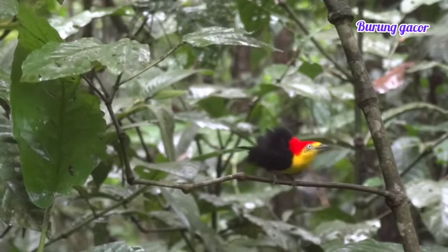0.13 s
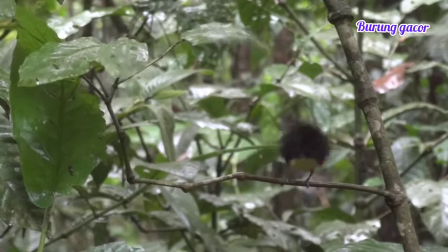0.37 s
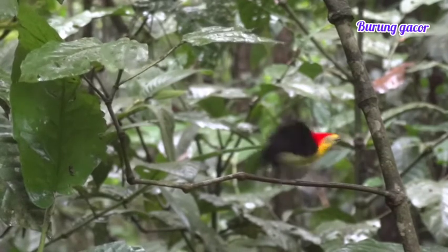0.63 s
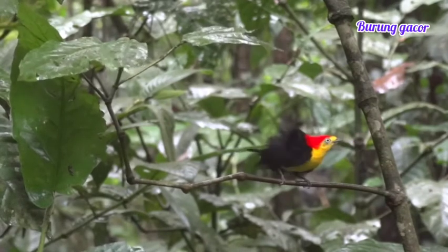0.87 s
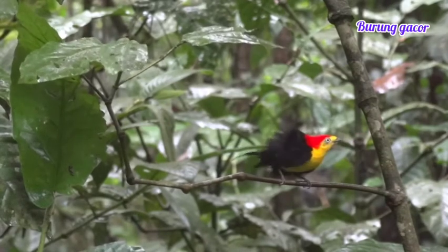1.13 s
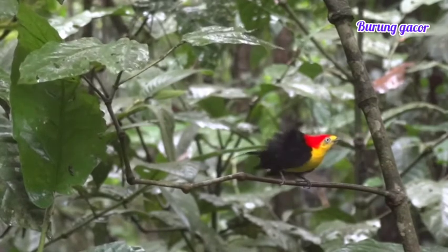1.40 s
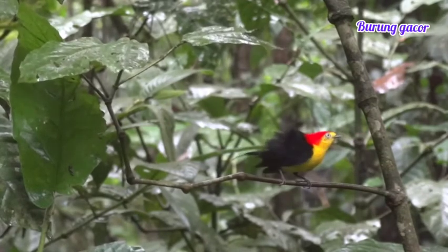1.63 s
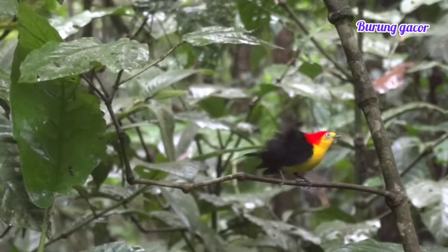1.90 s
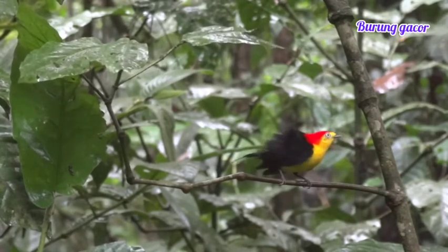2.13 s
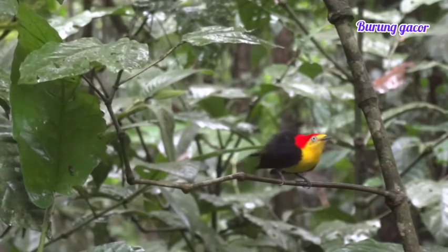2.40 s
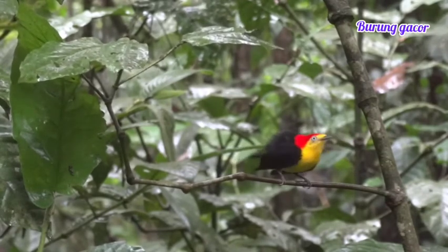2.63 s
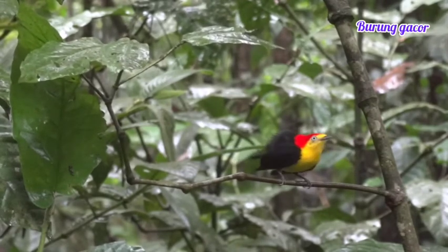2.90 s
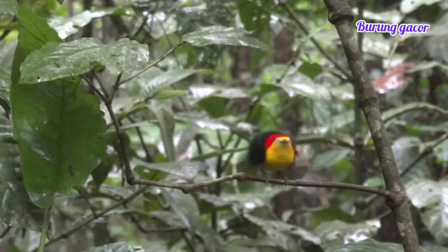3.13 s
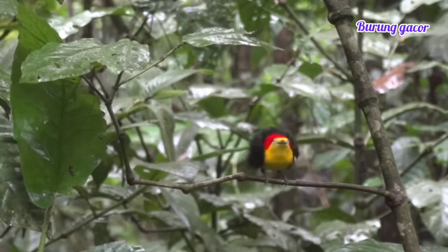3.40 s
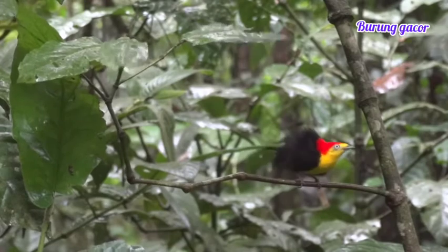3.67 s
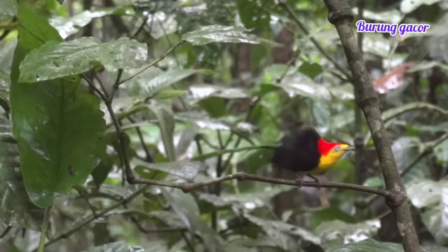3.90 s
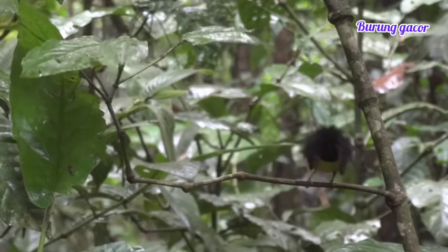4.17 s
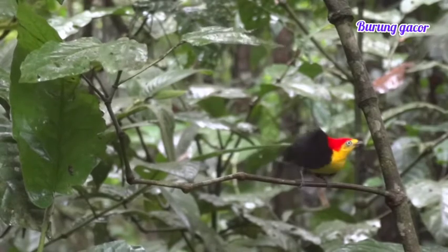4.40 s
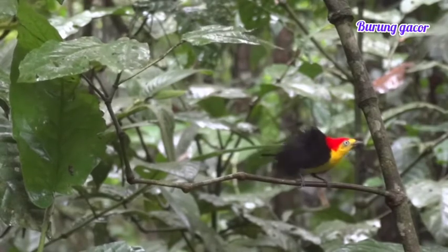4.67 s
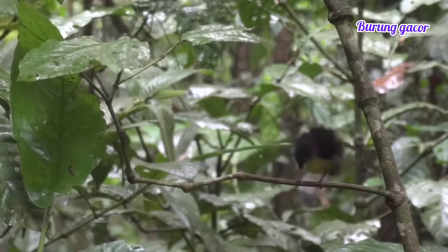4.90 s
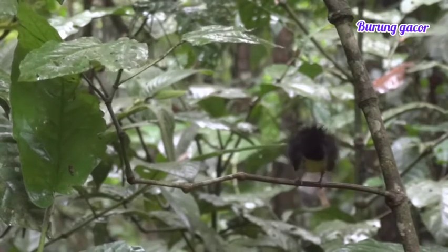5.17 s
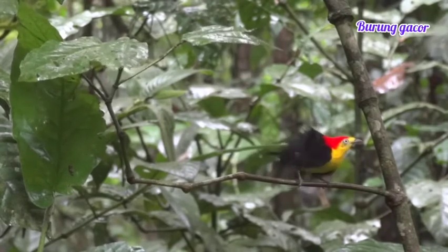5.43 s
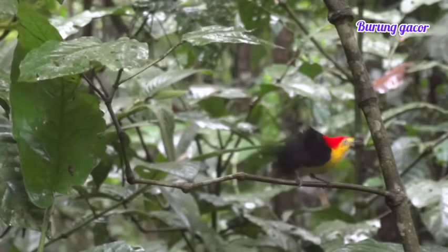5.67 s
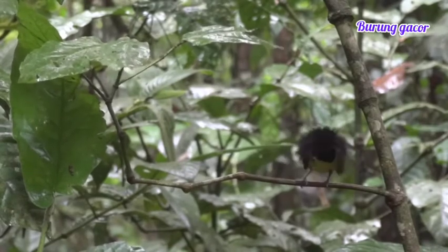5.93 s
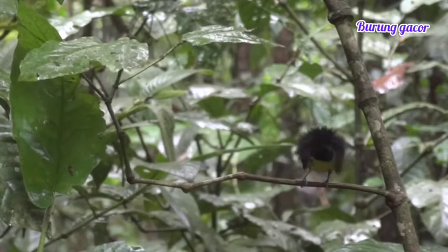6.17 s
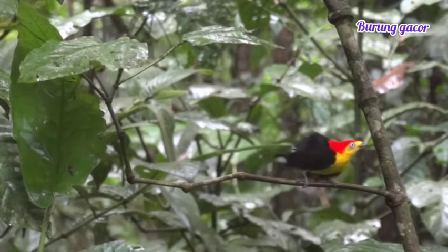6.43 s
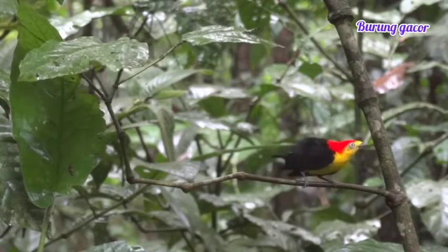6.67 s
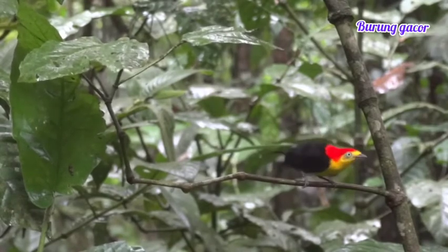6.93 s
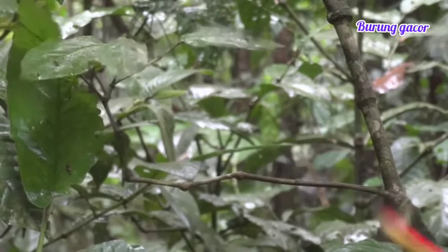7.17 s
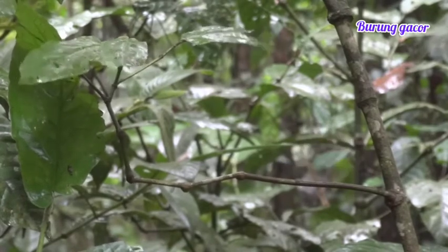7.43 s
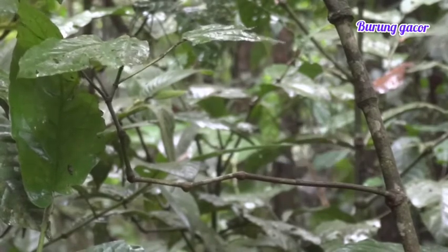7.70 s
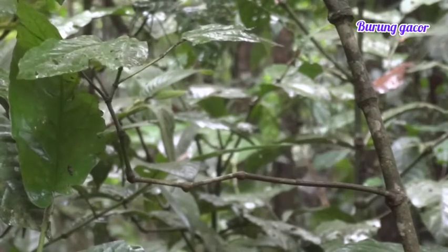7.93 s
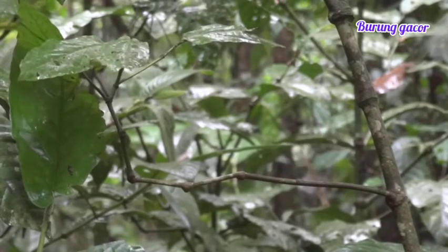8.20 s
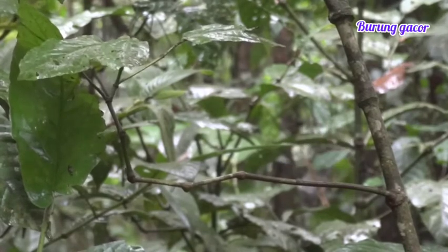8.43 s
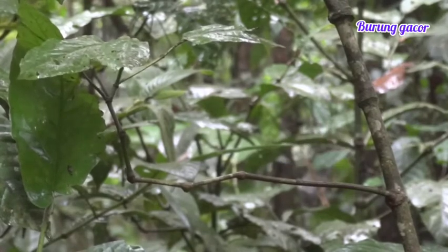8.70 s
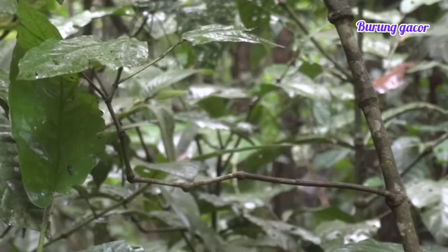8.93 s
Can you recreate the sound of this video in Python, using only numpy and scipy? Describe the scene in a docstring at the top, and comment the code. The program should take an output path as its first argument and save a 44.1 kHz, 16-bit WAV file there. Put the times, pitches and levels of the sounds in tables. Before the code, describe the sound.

High-pitched crickets and cicadas buzz without pause in a forest, a broad hiss dropping out early, a few dry snaps cutting through.

```python
"""Rainforest insect chorus

Crickets, cicadas, a rasper and a far frog: trains of strokes ring resonances, echoed by the trees.
Katydids and one cicada are coloured noise. Twigs snap in dying noise bursts; far coos and a whine are
narrow noise. Faintly, a camera's focus motor hums, whirrs and ticks its shell.
Behind: a blur of distant insects, a murmur of air and leaves, faint noise opposite left and right.
"""
import sys
import numpy as np
from scipy import signal
from scipy.io import wavfile
from scipy.ndimage import uniform_filter1d

SR = 44100
rng = np.random.default_rng(int(sys.argv[2]) if len(sys.argv) > 2 else 0)


def wrap_up_sound(samples):
    """Save the sound to the file named by the first command line argument, as 16-bit audio."""
    columns = np.atleast_2d(samples).T
    # keep every value between -1 and 1, then stretch to whole-number steps
    tamed = np.clip(columns, -1, 1)
    steps = np.round(tamed * 32767).astype(np.int16)
    wavfile.write(sys.argv[1], SR, steps)


def how_loud(loudness_db):
    """Turn decibels into a plain amplitude multiplier (0 dB gives 1, 20 dB gives 10)."""
    steps = np.asarray(loudness_db, float) / 20
    return 10 ** steps


N = 399987
T = np.arange(N) / SR

# chirps of the near crickets: start_s, length_s, level_db
CHIRPS = [(0, 0.25, -46), (.3, 0.21, -46), (.6, 0.24, -53), (.81, 0.29, -45.5), (1.1, 0.25, -45.5),
          (1.55, .19, -45), (1.78, 0.18, -52.5), (2.12, 0.21, -50.5), (2.55, 0.12, -49),
          (2.84, 0.18, -46.5), (3.19, 0.38, -51), (3.6, .18, -58), (3.9, .2, -51), (4.25, 0.31, -46.5),
          (4.64, .32, -45), (4.98, .39, -45.5), (5.418, 0.58, -46), (5.97, .26, -47.5), (6.27, 0.29, -46),
          (6.56, .15, -56), (6.83, 0.23, -44), (7.15, 0.24, -44), (7.49, 0.3, -46.5), (7.84, 0.42, -46),
          (8.35, 0.31, -46), (8.83, 0.3, -43.5)]
# slow level of the far cricket crowd, before a 5 dB cut: time_s, level_db
CRICKET_CROWD = [(0.0, -37), (0.3, -43.5), (4.37, -43.5), (4.95, -42), (6.97, -46), (7.7, -41.5),
                 (8.82, -43.5), (9.07, -41)]
# bursts of the buzzing cricket: start_s, length_s, level_db, wing_hz
BUZZES = [(0, 0.2, -47.5, 7090), (0.267, 0.26, -46.5, 6605), (0.61, 0.22, -44.5, 6850),
          (1.208, .32, -46.5, 6670), (1.784, 0.18, -44, 6580), (2.1, 0.17, -51.5, 6760),
          (2.41, 0.26, -48, 6740), (2.998, .24, -45.5, 6740), (3.538, .23, -47, 6670),
          (3.907, 0.15, -48.5, 6580), (4.307, .2, -46.5, 6840), (5.034, .2, -49, 6850),
          (5.46, 0.11, -50, 6710), (5.689, 0.21, -44, 6720), (6.056, 0.18, -44.5, 6810),
          (6.446, 0.26, -43.5, 6770), (6.835, 0.28, -47, 6740), (7.213, .22, -47, 6930),
          (7.514, 0.34, -46.5, 6650), (7.907, 0.29, -52, 6790), (8.217, 0.17, -50.5, 6900),
          (8.49, .25, -47.5, 6730), (8.81, 0.22, -49, 7010)]
# drumming cicada, swells in and breaks off: time_s, level_db
DRUMMER_LEVEL = [(0, -56), (.3, -56), (1.3, -52.5), (2.0, -56.5), (2.1, -66), (2.58, -70.5), (2.65, -79),
                 (2.78, -67.5), (3.5, -53), (4.2, -54.5), (4.7, -57.5), (5.7, -55), (5.85, -72), (6.1, -69),
                 (6.3, -72.5), (6.8, -57.5), (7.7, -58), (8.0, -58.5), (8.6, -54.5), (9.07, -54.5)]
# its beat and drum resonance: time_s, strokes_per_s, drum_hz
DRUMMER_DRUM = [(0, 107.2, 7780), (.75, 107.2, 7740), (.85, 106, 7680), (1.4, 106, 7800),
                (2.2, 106.1, 7850), (3.2, 105.8, 7640), (4.3, 107.1, 7760), (4.7, 107.6, 7980),
                (5.8, 107.5, 8050), (6.8, 105.6, 7560), (7.8, 107, 7740), (8.4, 107.7, 8020),
                (9.1, 107.7, 7900)]
# throbbing cicada, loudest of each throb: time_s, level_db
THROBBER_LEVEL = [(0, -56), (.8, -49.5), (2.5, -49.5), (4, -51.5), (6, -52.5), (9.07, -52.5)]
# its throb rate: time_s, throbs_per_s
THROB_RATE = [(0, 3.79), (2.99, 3.79), (3.01, 3.735), (9.07, 3.735)]
# its drum resonances: centre_hz, width_hz, gain_db
THROBBER_DRUM = [(5197, 217, 0), (5495, 230, 0.043)]
# hissing cicada, falls silent early: time_s, level_db
HISSER_LEVEL = [(0, -53), (.4, -55.5), (.8, -52.5), (1.5, -52.5), (2.5, -54), (2.6, -65.5), (3.4, -72),
                (3.6, -91.5), (9.1, -82)]
# its relative spectrum: freq_hz, density_db_per_hz
HISSER_COLOUR = [(1900, -47), (2300, -34.5), (2800, -19), (3200, -10.5), (4300, -10.5), (4900, 2),
                 (5600, 2), (5900, -4), (9500, -14), (11000, -39.5)]
# rising rasps, ever closer together: start_s, level_db
RASPS = [(0.32, -59.5), (0.82, -60), (1.36, -60), (1.79, -60.5), (2.35, -60), (2.784, -59.5), (3.232, -58),
         (3.62, -58.5), (4.012, -58), (4.425, -59), (4.81, -58.5), (5.17, -58), (5.517, -57.5),
         (5.868, -58), (6.196, -58.5), (6.51, -60), (6.845, -58), (7.16, -58), (7.473, -57.5), (7.792, -58),
         (8.12, -58), (8.43, -59), (8.73, -56.5), (9.032, -58)]
# thin tree-cricket note: time_s, level_db
TREE_CRICKET = [(0, -68), (3.2, -69.5), (4.3, -72.5), (5, -66.5), (5.45, -69.5), (5.9, -65), (7.1, -70.5),
                (7.9, -72.5), (8.5, -71.5), (9.07, -66)]
# bed of high katydids, uneven, fading away by 4.2 s: time_s, level_db
KATYDID_BED = [(0, -63), (1.0, -60.5), (1.7, -63.5), (2.3, -62.5), (2.6, -72.5), (3.1, -76), (3.7, -71),
               (3.95, -81), (4.2, -95)]
# katydid swells: middle_s, level_db, half_length_s
KATYDID_SWELLS = [(.46, -58.5, .09), (1.25, -57.5, .12), (1.96, -57.5, 0.1), (2.78, -58.5, .12),
                  (3.43, -58.5, 0.096)]
# katydid relative spectrum: freq_hz, density_db_per_hz
KATYDID_COLOUR = [(6060, -52), (10300, -12.5), (11100, -8.5), (11200, -0.5), (12000, -3.5), (14300, -6.5),
                  (15300, -16), (15500, -20)]
# frog croaks, before a 5 dB cut: start_s, level_db, throat_hz
CROAKS = [(.642, -84, 1850), (1.33, -84, 1850), (2.037, -84, 1850), (2.59, -86, 2120), (2.879, -84, 1800),
          (3.33, -84, 2100), (3.659, -85, 1840), (4.052, -83, 2120), (4.271, -83, 1850), (5.0, -85, 1870),
          (5.711, -85, 1870), (6.34, -85, 1820), (6.58, -78.5, 2150), (7.119, -86, 1780),
          (7.695, -87, 2100), (7.959, -85.5, 1840), (8.51, -83.5, 1880)]
# twig snaps, the first two close together: start_s, level_db, centre_hz, width_hz, t60_s
SNAPS = [(0.814, -38, 8700, 3800, 0.21), (0.95, -50, 7500, 9500, 0.046), (4.476, -44, 4300, 1900, .055),
         (6.724, -59, 5000, 4900, 0.032)]
# faint dove-like notes, one list each: time_s, level_db, pitch_hz
COOS = [
    [(1.88, -105, 580), (1.95, -85.5, 587), (2.1, -101, 605), (2.3, -94, 580), (2.38, -90, 690),
     (2.48, -94, 716), (2.55, -108, 690)],
    [(7.26, -110, 215), (7.32, -86, 218), (7.4, -112, 217)],
]
# hair-thin whine of a small insect: time_s, level_db, pitch_hz
WHINE = [(1.5, -95, 14150), (1.8, -81, 15000), (2.7, -78.5, 13900), (3.3, -77, 14150), (3.9, -81, 14150),
         (4.1, -92, 14600)]
# runs of motor steps, strike level ahead of the shell: first_step, step_count, strike_db
TICKS = [(0, 2, -81), (3, 1, -89), (5, 3, -82), (8, 1, -88), (10, 2, -87), (17, 3, -82), (21, 1, -84),
         (23, 2, -81), (27, 2, -80), (37, 1, -81), (40, 3, -83), (47, 4, -84), (52, 2, -81), (55, 2, -83),
         (59, 2, -83), (62, 5, -84), (72, 4, -81), (77, 1, -80), (79, 1, -83), (82, 7, -82), (89, 1, -89),
         (123, 1, -89), (131, 1, -87)]
# camera shell modes: mode_hz, gain_db, t60_s
SHELL = [(513, -17, 0.056), (580, 7.5, 0.025), (660, 3, 0.024), (1110, -2, 0.023), (1370, 10.5, 0.027),
         (1780, -4, 0.1)]
# motor hum: time_s, level_db
HUM = [(0, -97.5), (1.05, -103), (1.7, -98), (2.4, -101), (3.4, -99), (5.9, -99), (6.27, -107), (6.4, -116),
       (8.1, -117), (8.36, -100), (9.07, -101)]
# relative spectrum of the motor whirr: freq_hz, density_db_per_hz
WHIRR = [(25, -26), (60, -11), (110, -2), (220, -8), (380, -16.5), (560, 8), (750, -12.5), (1400, -5.5),
         (1600, -16)]
# relative spectrum of the distant insects: freq_hz, density_db_per_hz
WASH = [(2300, -54), (2600, -52.5), (2900, -34), (3400, -20.5), (4400, -23), (5300, -11), (5900, -17.5),
        (6400, -1.5), (7200, -24.5), (8300, -20), (10300, -32), (11500, -34), (15600, -39)]
# relative spectrum of air and leaves: freq_hz, density_db_per_hz
AIR = [(25, -16), (70, -3), (220, -8), (380, -11.5), (720, 1.5), (1200, -13), (1400, -14.5), (1600, -12),
       (1900, -13.5), (2100, -0.5), (2500, -1.5), (2900, -24)]
# relative spectrum of the noise between left and right: freq_hz, density_db_per_hz
SIDE_NOISE = [(18, -54), (30, -17), (104, -42), (368, -14.5), (770, -24), (1370, -19), (2480, -33.5),
              (3380, -12.5), (4400, -26), (6440, -8), (9000, -18.5), (11700, -47), (19800, -120)]


def evened(x):
    """Scales to rms 1."""
    return x / np.sqrt(np.mean(x ** 2) + 1e-20)


def follow(rows):
    """Table columns after the first, joined by straight lines in time."""
    time_s, *columns = np.transpose(rows)
    return [np.interp(T, time_s, column) for column in columns]


def wander(top_hz):
    """Slow chance up to top_hz, rms 1: sines of random phase, weaker as they get faster."""
    s = np.arange(0, N / SR + 1, 0.01)
    waves = np.zeros(len(s))
    for hz in np.geomspace(top_hz / 20, top_hz, num=24):
        waves += np.sin(2 * np.pi * (hz * s + rng.random())) / np.sqrt(hz)
    return np.interp(T, s, evened(waves))


def resonate(x, centre_hz, width_hz, order=2):
    """Steep-sided moving resonance: shifts centre_hz to zero, low-passes, shifts back."""
    turn = np.exp(2j * np.pi * np.cumsum(centre_hz * np.ones(N)) / SR)
    lowpass = signal.butter(order, width_hz / SR, output="sos")
    return 2 * (turn * signal.sosfilt(lowpass, x / turn + 1e-18)).real


def hiss(colour, patchy_db):
    """Coloured noise, rms 1, from random short-time spectra with drifting patches."""
    bin_hz = np.fft.rfftfreq(1024, 1 / SR)
    real, imag, patches = rng.standard_normal((N // 256 + 5, 513, 3)).T
    patches = uniform_filter1d(patches, size=8, axis=0)  # across frequency
    patches = evened(uniform_filter1d(patches, size=12, axis=1))  # across time
    hz, db = np.transpose(colour)
    tone_db = np.interp(np.log(bin_hz + 1), np.log(hz), db, left=-120, right=-120)[:, None]
    spectra = (real + 1j * imag) * how_loud(tone_db + patchy_db * patches)
    return evened(signal.istft(spectra, nperseg=1024, noverlap=768)[1][:N])


def strokes(per_s, centre_hz, drift, rough, count=6, fade_db=0):
    """Stroke train: multiples of its rate near centre_hz, mixed with stroke-gated noise."""
    turns = np.cumsum(per_s * (1 + drift * wander(3))) / SR
    middle = round(centre_hz / np.mean(per_s))
    clean = np.zeros(N)
    for k in range(middle - count, middle + count + 1):
        # moving leaves fade each multiple on its own
        fade = how_loud(fade_db * wander(14)) if fade_db else 1
        clean += fade * np.cos(2 * np.pi * (k * turns + 0.51 * rng.random()))
    scrape = (0.9 + np.exp(-(turns % 1) / 0.25)) * rng.standard_normal(N)
    # same power per Hz as the multiples
    spread = np.sqrt(SR / (2 * (2 * count + 1) * np.mean(per_s)))
    share = np.clip(rough, 0, 1)
    return np.sqrt(1 - share) * evened(clean) + np.sqrt(share) * spread * evened(scrape)


def trees(x, t60_s, wet_db):
    """Direct sound plus dense decaying echoes from trunks and leaves."""
    s = np.arange(SR // 2) / SR
    echoes = rng.standard_normal(len(s)) * (rng.random(len(s)) < 0.05)
    tail = echoes * how_loud(-60 * s / t60_s) * (s > 0.004)
    wet = signal.oaconvolve(x, tail / np.linalg.norm(tail))[:N]
    return (x + how_loud(wet_db) * wet) / np.sqrt(1 + how_loud(2 * wet_db))


def bursts(rows, rise_s, fall_s):
    """Amplitude of calls that rise, hold and fall; half height at each start and end."""
    s = T[::64]
    shapes = []
    for start_s, length_s, db, *_ in rows:
        edge = np.minimum((s - start_s) / rise_s, (start_s + length_s - s) / fall_s)
        shapes.append(how_loud(db) * np.clip(edge + 0.5, 0, 1))
    return np.interp(T, s, np.max(shapes, axis=0))


def crickets():
    """Wing strokes ring narrow notes (near crickets, far crowd) and a wider moving one (buzzer)."""
    chirps = bursts(CHIRPS, rise_s=0.044, fall_s=0.076)
    buzzes = bursts(BUZZES, rise_s=0.018, fall_s=0.059)

    note = resonate(strokes(69.5, 6270, 0.001, rough=0.7, count=3), 6262 + 12 * wander(2), 95)
    near = np.hypot(chirps, how_loud(-55)) * evened(note)  # fainter neighbours fill the pauses

    joining = np.hypot(how_loud(-4.5) * chirps, how_loud(-1.5) * buzzes)  # the crowd joins both calls
    crowd_level = np.hypot(joining, how_loud(follow(CRICKET_CROWD)[0] - 5))
    crowd_note = resonate(strokes(69.5, 6500, 0.0042, rough=0.86, count=4), 6504, 260)
    crowd = crowd_level * evened(crowd_note)

    start_s, length_s, _, hz = np.transpose(BUZZES)
    wing_hz = np.interp(T, start_s + length_s / 2, hz)
    drive = strokes(120.43, 6750, 0.0006, rough=0.25, count=2, fade_db=3.5)
    buzz = np.hypot(buzzes, how_loud(-57)) * evened(resonate(drive, wing_hz, 400, order=3))
    return trees(near + crowd, 0.3, -6) + trees(buzz, 0.13, -8.5)


def drumming_cicada():
    """Clean drum strokes ring a resonance that tightens through each phrase, plus a fixed wide one."""
    per_s, drum_hz = follow(DRUMMER_DRUM)
    drive = strokes(per_s, 8400, 0.0006, rough=0.2, count=8, fade_db=4)
    drum = resonate(drive, drum_hz, 470) + 0.49 * resonate(drive, 8000, 1500)
    return how_loud(follow(DRUMMER_LEVEL)[0] + wander(16)) * evened(drum)  # wavers 1 dB rms


def throbbing_cicada():
    """Rough drum strokes ring two resonances; each throb rises quickly, then sags ever deeper."""
    start_throbs, rise_throbs, sag_db, sag_bend = -0.088, 0.043, -15, 5.7
    done = (start_throbs + np.cumsum(follow(THROB_RATE)[0]) / SR) % 1
    rising = np.maximum(1 - done / rise_throbs, 0)
    level_db = follow(THROBBER_LEVEL)[0] + sag_db * np.maximum(rising, done ** sag_bend)
    drive = strokes(88, 5350, 0.0044, rough=0.92)
    drum = sum(how_loud(db) * resonate(drive, hz, width, order=3) for hz, width, db in THROBBER_DRUM)
    return how_loud(level_db) * evened(drum)


def hissing_cicada():
    """Wide patchy noise of fixed colour under a level curve."""
    return how_loud(follow(HISSER_LEVEL)[0]) * hiss(HISSER_COLOUR, 1.4)


def rasper():
    """Rough strokes ring a fixed resonance and one that climbs in the first half of each rasp."""
    low_hz, climb_hz, rasp_s = 3250, 430, 0.19
    centre_hz, level = np.full(N, float(low_hz)), np.zeros(N)
    for start_s, db in RASPS:
        part = (T > start_s - 0.02) & (T < start_s + rasp_s)
        done = np.linspace(0, 1, part.sum())
        centre_hz[part] = low_hz + climb_hz * np.minimum(done / 0.5, 1) ** 0.62
        edges = np.minimum(done / 0.14, 1) * np.minimum((1 - done) / 0.13, 1)
        level[part] = how_loud(db) * edges * (0.9 + 0.067 * done)
    scrape = strokes(102, 3500, 0.004, rough=0.9)
    ringing = resonate(scrape, centre_hz, 370, order=4) + 0.44 * resonate(scrape, 3275, 300, order=4)
    return trees(level * evened(ringing), 0.18, -9)


def tree_cricket():
    """Rough wing strokes ring one narrow note of wavering pitch."""
    drive = strokes(24.5, 4120, 0.004, rough=0.92)
    note = resonate(drive, 4120 + 12 * wander(1), 90)
    return how_loud(follow(TREE_CRICKET)[0]) * evened(note)


def katydids():
    """High coloured noise: an uneven, fading bed with bell-shaped swells."""
    swells = sum(how_loud(db) * np.exp(-((T - middle_s) / half_s) ** 2)
                 for middle_s, db, half_s in KATYDID_SWELLS)
    return np.hypot(how_loud(follow(KATYDID_BED)[0]), swells) * hiss(KATYDID_COLOUR, 1.1)


def frog():
    """Short croaks: strokes ring a throat resonance, with long echoes from the trees."""
    start_s, db, throat_hz = np.transpose(CROAKS)
    row = np.maximum(np.searchsorted(start_s, T) - 1, 0)
    since_s = T - start_s[row]
    shape = np.clip(since_s / 0.0039, 0, 1) * np.clip((0.075 - since_s) / 0.02, 0, 1)
    drive = strokes(110, 1950, 0.0067, rough=0.35, count=4)
    croaks = how_loud(db[row] - 5) * shape * evened(resonate(drive, throat_hz[row], 200))
    return trees(croaks, 0.96, 0.5)


def snaps():
    """Twig snaps: band-limited noise with a sudden start and exponential decay."""
    out = np.zeros(N)
    for start_s, db, hz, width_hz, t60_s in SNAPS:
        decay = how_loud(-60 * np.maximum(T - start_s, 0) / t60_s)
        burst = rng.standard_normal(N) * (T > start_s) * decay
        # offsets the power lost to the band limit
        out += how_loud(db) * np.sqrt(SR / (4 * width_hz)) * resonate(burst, hz, width_hz, order=5)
    return out


def soft_notes():
    """Far coos and a thin whine: noise through a 30 Hz wide gliding resonance."""
    out = np.zeros(N)
    for rows in COOS + [WHINE]:
        db, hz = follow(rows)
        sounding = (T > rows[0][0]) & (T < rows[-1][0])
        out += how_loud(db) * sounding * evened(resonate(rng.standard_normal(N), hz, 30))
    return out


def focus_motor():
    """Clocked steps rattle and ring the camera shell, over a hum and whirr."""
    clock_start_s, step_s, hum_hz = 0.0695, 0.066733, 134.6
    steps = np.concatenate([first + np.arange(many) for first, many, _ in TICKS])
    levels_db = np.concatenate([[db] * many for _, many, db in TICKS])
    levels_db = levels_db + 0.8 * rng.standard_normal(len(steps))
    shakes = rng.standard_normal((len(steps), 600)) * np.hanning(600) / 30
    knock = signal.windows.hann(600) ** 400  # the step itself
    rattle = np.zeros(N + SR)
    for at_s, db, shake in zip(clock_start_s + step_s * steps, levels_db, shakes):
        rattle[int(at_s * SR):][:600] += how_loud(db) * (shake + 0.12 * knock)
        rattle[int((at_s + step_s / 2) * SR):][:600] += how_loud(db - 6) * shake[::-1]  # weaker half step

    s = np.arange(SR // 5) / SR
    ring = sum(how_loud(db - 60 * s / t60_s) * np.sin(2 * np.pi * hz * s) for hz, db, t60_s in SHELL)
    ring *= np.minimum(s / 0.004, 1)  # padded, not sharp
    shell = signal.oaconvolve(rattle, ring)[:N]
    clack = how_loud(26) * resonate(rattle[:N], 1100, 1200, order=3)  # the rattle heard directly

    tone = np.sin(2 * np.pi * hum_hz * T + 0.82 * wander(10))
    hum = np.sqrt(2) * how_loud(1.8 * wander(20)) * tone
    whirr = how_loud(4) * hiss(WHIRR, 3.9)
    return shell + clack + how_loud(follow(HUM)[0]) * (hum + whirr)


def distant_insects():
    """Coloured noise of slowly wandering level: a blur of far insects."""
    return how_loud(-49 + 0.49 * wander(2.3)) * hiss(WASH, 1.9)


def air_and_leaves():
    """Low patchy noise: murmur of air and leaves."""
    return how_loud(-95) * hiss(AIR, 5.8)


def side_noise():
    """Faint patchy noise of fixed colour."""
    return how_loud(-84) * hiss(SIDE_NOISE, 4)


def scene():
    """All voices are equal left and right; faint patchy noise is opposite in sign."""
    cicadas = trees(drumming_cicada() + throbbing_cicada() + hissing_cicada(), 0.33, -2.5)
    voices = crickets() + cicadas + rasper() + tree_cricket() + katydids() + frog()
    forest = distant_insects() + air_and_leaves()
    heard = voices + snaps() + soft_notes() + focus_motor() + forest
    apart = side_noise()
    return np.array([heard + apart, heard - apart])


def low_pass(x):
    """Removes everything above the highest recorded frequency."""
    return signal.sosfilt(signal.butter(12, 15690, fs=SR, output="sos"), x)


def record(dry):
    """Passes on the finished stereo mix."""
    return low_pass(dry)


dry = scene()
out = record(dry)
wrap_up_sound(out)
```